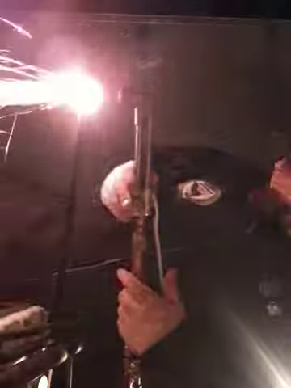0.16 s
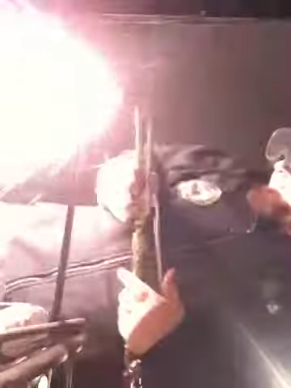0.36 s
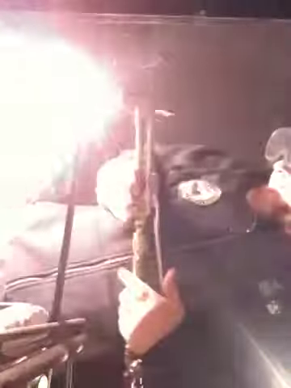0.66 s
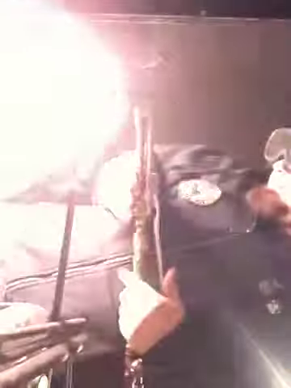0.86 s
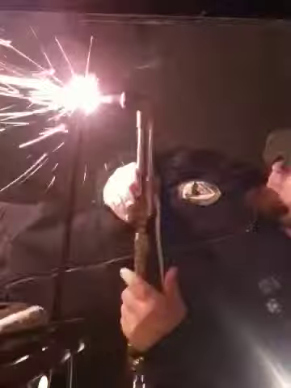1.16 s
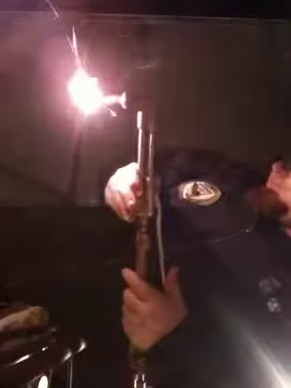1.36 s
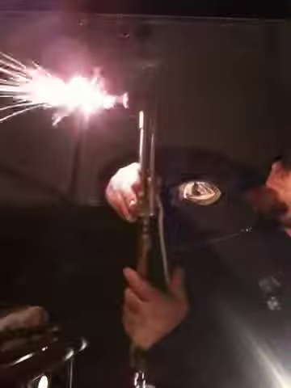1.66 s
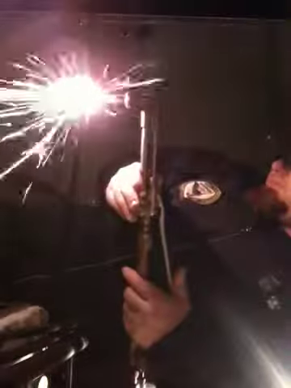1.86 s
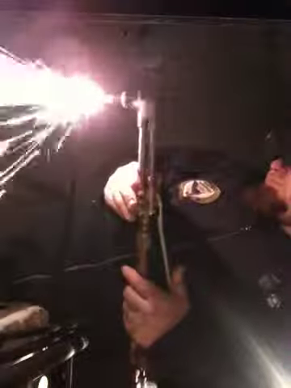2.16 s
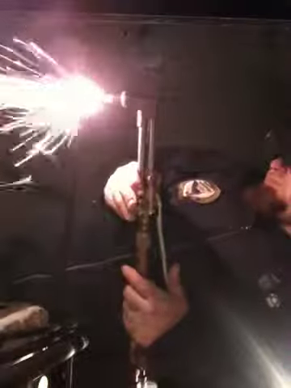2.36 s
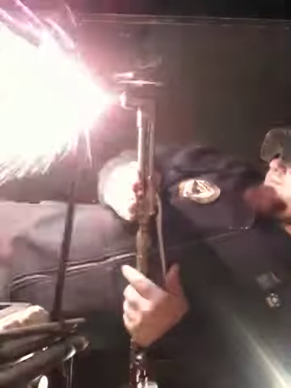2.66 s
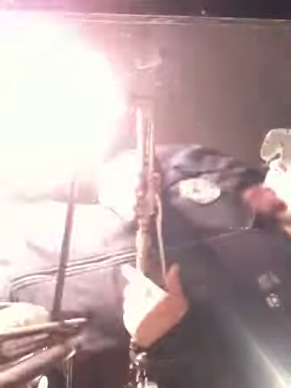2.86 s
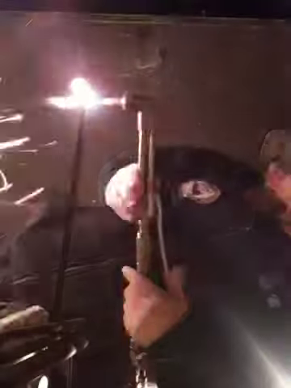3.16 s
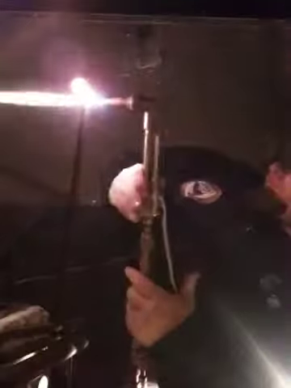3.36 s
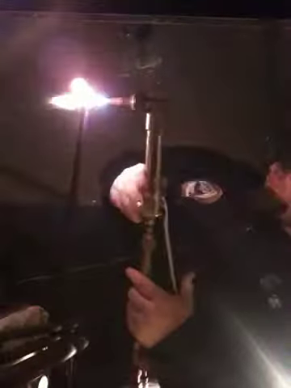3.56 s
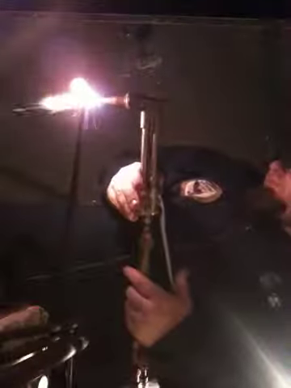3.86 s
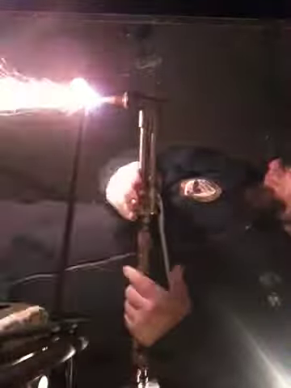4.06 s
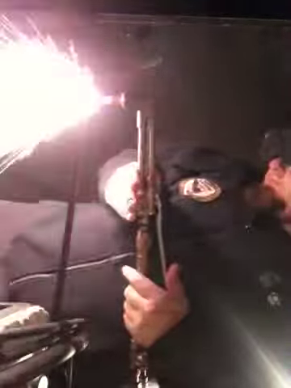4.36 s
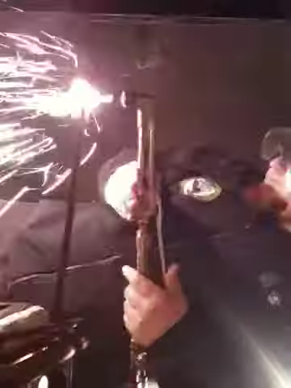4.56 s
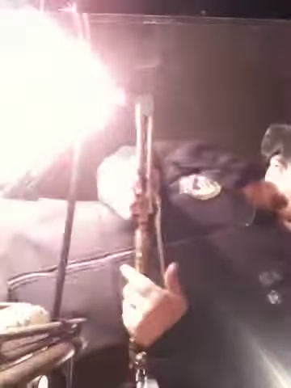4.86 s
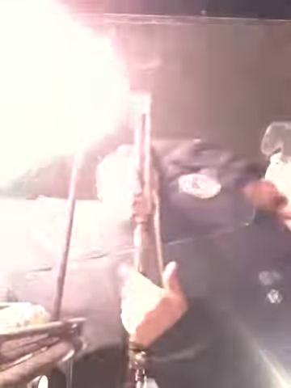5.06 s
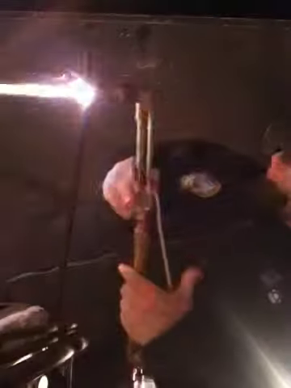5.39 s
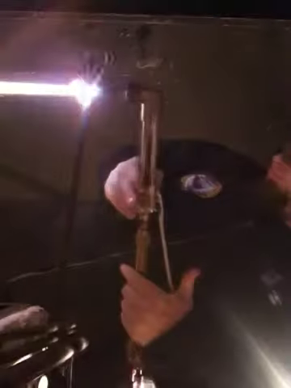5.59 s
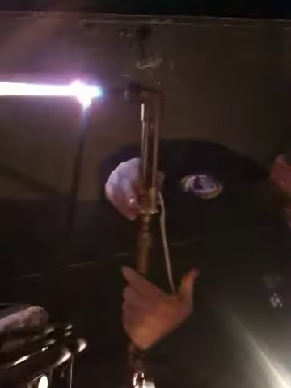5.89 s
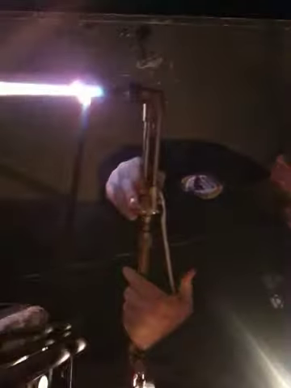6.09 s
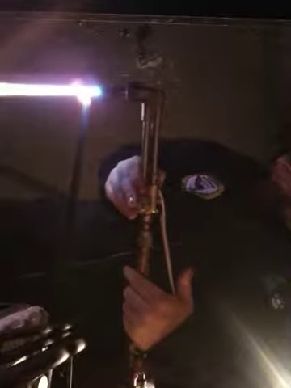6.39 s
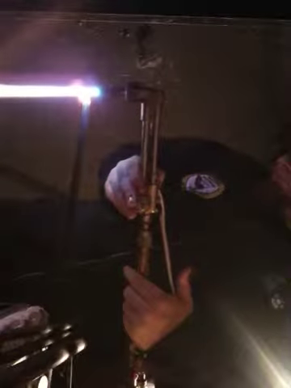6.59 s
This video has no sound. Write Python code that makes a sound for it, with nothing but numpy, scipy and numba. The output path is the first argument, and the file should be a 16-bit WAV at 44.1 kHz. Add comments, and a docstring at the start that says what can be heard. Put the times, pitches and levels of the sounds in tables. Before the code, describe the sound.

A cutting torch blasts three harsh, bright bursts of hissing oxygen through burning steel, then a lever knocks shut and a low flame roar swells.

```python
"""A gas cutting torch in a small workshop, a step or two from a single microphone.
Three bursts of cutting oxygen, from about 0, 2.3 and 4 s, are shaped noise that hisses, scours and rushes in the cut.
Steel burns and a heating flame roars low throughout, as noise in fluttering bands; light ticks ring the torch body.
After the third burst the lever snaps back with a dull knock at 5.6 s, and the roar swells towards the end.
Walls and bench give the torch fixed peaks and dips and a short tail; faint air noise lies under it all."""
import sys
import numpy as np
from scipy import signal
from scipy.fft import rfft, irfft, next_fast_len
from scipy.io import wavfile
from scipy.ndimage import uniform_filter1d
from numba import njit

SR = 44100
rng = np.random.default_rng(int(sys.argv[2]) if len(sys.argv) > 2 else 0)


def wav_out(sig):
    """Save sig, one row per channel (or a flat mono array), as 16-bit PCM at SR to the path in sys.argv[1]."""
    wavfile.write(sys.argv[1], SR, np.round(np.clip(np.atleast_2d(sig).T, -1, 1) * 32767).astype(np.int16))


def convert_level_to_amplitude(level_db):
    """Map a level in decibels to its linear amplitude factor."""
    exponent = np.asarray(level_db, float) / 20
    return 10 ** exponent


N = 296793
TIME = np.arange(N) / SR

# Spectral density of the air noise: f/Hz, level/dB
AIR_SPECTRUM = [(40, -1), (300, -0.5), (6000, -10), (16000, -18.5)]
AIR_DB = -68

# Spectral density of the faint rumble: f/Hz, level/dB
RUMBLE_SPECTRUM = [(25, 2.5), (60, -25), (110, -33.5), (150, -56), (300, -88)]
RUMBLE_DB, RUMBLE_SLOPE = -40.5, 0.4  # level when the roar is at FLARE_DB; dB of rumble per dB of roar

# Low roar of the heating flame over time: t/s, level/dB
ROAR_LEVEL = [(0.03, -63.5), (0.96, -59.5), (2.3, -62), (3.4, -58.5), (3.9, -55.5), (4.42, -65),
              (5.1, -56.5), (5.39, -60.5), (5.7, -48.5), (6.04, -51), (6.16, -48.5), (6.7, -50)]
# Spectral density of that roar: f/Hz, level/dB
ROAR_SPECTRUM = [(60, -44), (120, -15.5), (170, -5.5), (230, -3), (350, 0.5), (600, -3), (900, -7),
                 (1800, -48), (4000, -82)]
FLARE_DB, FLARE_SLOPE = -57, 2.18  # extra roar at strong burning; dB of it per dB of burning
STRONG_BURN_DB = -42

# Burning at the cut over time: t/s, level/dB
BURN_LEVEL = [(0.03, -48.5), (0.39, -52), (0.58, -58.5), (1.17, -57.5), (1.38, -51), (1.72, -52.5),
              (1.79, -58), (1.99, -53.5), (2.03, -58.5), (2.28, -53.5), (2.34, -52), (2.42, -55.5),
              (2.89, -56.5), (3.07, -53.5), (3.15, -48), (3.408, -42), (3.498, -49.5), (3.55, -47),
              (3.6, -50), (3.72, -47), (3.942, -42.5), (3.982, -46), (4.478, -48), (4.512, -41),
              (4.545, -44), (4.712, -56), (4.91, -48.5), (4.926, -45.5), (4.97, -49), (5.516, -41.5),
              (5.56, -47.5), (5.66, -54), (5.78, -51), (5.822, -53.5), (6.19, -50.5), (6.426, -49.5),
              (6.7, -51.5)]
# Spectral density of the burning steel: f/Hz, level/dB
BURN_SPECTRUM = [(250, -24), (500, -4), (1100, 2), (1800, -5), (2700, -11.5), (5000, -22.5), (8000, -33),
                 (16000, -71)]

# Blows of lever and spatter: t/s, level/dB, dull knock over the tick/dB, decay constant of the rattle/s
BLOWS = [(1.739, -38, -20, 0.003), (4.514, -50, -14, 0.0041), (5.582, -39, 6.5, 0.0059),
         (5.592, -44, 10, 0.0098), (5.613, -53.5, 14.5, 0.018), (5.866, -60.5, -16, 0.018),
         (5.997, -58, -16, 0.0072)]
# Dull modes of the torch body: f/Hz, level/dB, t60/s
KNOCK_MODES = [(196, -14, 0.032), (261, 0, 0.034), (322, -4, 0.071), (580, -11, 0.035), (1350, -6, 0.012)]
# Bright modes of the torch body: f/Hz, level/dB, t60/s
TICK_MODES = [(3100, -1, 0.013), (3450, -5, 0.014), (4550, -1, 0.0081), (6500, -2, 0.0065),
              (7200, 4, 0.0068), (8260, -1, 0.0052), (9400, -4, .004)]

# Presses of the oxygen lever: opening t/s, shutting t/s, closing rate/(dB/s),
# leaking hiss from the opening on, level/dB, idle rush in the cut over the burning/dB
PRESSES = [(0.006, 1.961, 360, -84, -5.5), (2.253, 3.414, 293, -77.5, -10), (4.039, 5.47, 211, -79, -15)]
OPENING_S, OPENING_BEND = 0.044, 0.89  # time to full flow; exponent of the rise
BLEED_DB, BLEED_DB_PER_S = -24, 54  # gas left in the torch drains slowly after shutting

# Hiss at the nozzle while the lever is held, one curve a press: t/s, level/dB
HISS_LEVELS = [
    [(0.05, -35), (0.296, -35.5), (0.426, -41), (0.642, -39), (0.722, -43.5), (1.072, -43.5), (1.24, -40),
     (1.29, -32.5), (1.492, -31.5), (1.77, -32), (1.8, -38.5), (1.9, -42.5), (1.958, -48.5)],
    [(2.29, -38), (2.32, -35.5), (2.36, -36), (2.4, -44), (2.524, -37.5), (2.828, -41.5), (3.106, -41),
     (3.128, -38), (3.25, -34), (3.326, -36.5), (3.414, -42.5)],
    [(4.08, -41), (4.12, -38.5), (4.314, -35.5), (4.424, -38), (4.596, -37.5), (4.65, -45), (4.81, -39.5),
     (4.826, -37), (4.956, -40), (5.004, -36.5), (5.044, -40.5), (5.162, -39), (5.268, -33.5), (5.382, -36),
     (5.47, -38.5)],
]
# How the jet strikes the steel: t/s, centre of the scouring f/Hz, scouring over its place between hiss and burning/dB,
# shock cells over the hiss/dB, rush in the cut over the burning/dB
STRIKE = [(0.05, 5060, 3, -4, 3.5), (0.4, 5140, 3.5, -5.5, 5.5), (0.68, 4930, 0.2, -2, 2.5),
          (1.0, 4550, 0.5, -3, 4.5), (1.25, 4600, 0.8, -7.5, 2.5), (1.42, 4200, -3, -6, 2),
          (1.74, 4300, 0.5, -6.5, 4), (1.9, 4760, 4, -1.5, 5.5), (2.33, 4540, 1.7, -4, 3.5),
          (2.6, 4740, 2, -5.5, 5), (3.05, 4680, -0.5, -3, 2.5), (3.17, 4550, 2.5, -3, 6.5),
          (3.27, 4260, 0.2, -4, 2.5), (3.42, 5030, 3.5, 2, 2), (3.7, 4080, -7, -4, 3),
          (3.98, 4000, 12, -1, 7), (4.12, 4750, 0, -3.5, 2.5), (4.5, 4500, 0.1, -3.5, 1),
          (4.75, 4680, .6, -6, 3.5), (5.1, 4650, -.6, -5.5, 1), (5.3, 4750, 1, -3.5, 3),
          (5.5, 4804, 2, .6, 3), (5.75, 4220, .6, -1, 3)]
# Spectral density of the hiss: f/Hz, level/dB
HISS_SPECTRUM = [(1500, -46), (4000, -8), (6000, -30), (8000, -1.5), (10500, -0.5), (12500, -1.5),
                 (13700, 0.5), (15000, -4.5), (15700, -5)]
# Spectral density of the jet's shock cells: f/Hz, level/dB
SHOCK_SPECTRUM = [(3000, -54), (5900, -5), (6350, -1), (7350, -1.5), (7800, -6.5), (14000, -27)]
# Spectral density of the scouring, ahead of its moving band-pass: f/Hz, level/dB
SCOUR_SPECTRUM = [(1500, -20), (3000, -2.5), (6000, -3.5), (10000, -22)]
# Spectral density of the rush inside the cut: f/Hz, level/dB
KERF_SPECTRUM = [(700, -25), (1500, -2.5), (2100, -4.5), (2800, -2.5), (3400, -7), (5000, -32), (9000, -41)]
SCOUR_BURN_SHARE = 0.36  # how far, in dB, the scouring lies from hiss (0) towards burning (1)
IDLE_SCOUR_DB = -5.5  # idle scouring relative to the idle rush in the cut
IDLE_SLOPE = 0.51  # dB that the idle rush gains over the burning per dB of burning

# Peaks and dips of room, bench and microphone: f/Hz, width/Hz, level/dB
ROOM_COLOUR = [(181, 46, 4), (241, 51, 6.5), (293.7, 67, -12.5), (360.6, 53, 5), (428, 110, -5.5),
               (585, 79, 5.5), (685.3, 38, 9.5), (732, 220, -3.5), (1096, 270, 3), (1074, 38, 3),
               (1210, 69, -2.5), (1460, 320, -1.5), (1622, 29, 4.5), (1983, 470, -3), (2163, 41, 5),
               (2380, 130, -6.5), (2724, 370, 3), (2910, 240, 0.5), (3370, 180, 2), (3836, 150, 2.5),
               (4650, 46, -7), (4990, 600, 3), (6203, 90, 3.5), (6600, 190, 0), (6830, 79, 4.5),
               (7380, 120, 3), (10600, 220, -0.5), (15400, 430, 5.5)]
ROOM_T60_S, ROOM_DB = 0.15, -10.5  # decay of the tail's lower part; energy of the tail against the direct sound


def curve(rows):
    """Columns of a table joined by straight lines in time."""
    s, *columns = np.transpose(rows)
    return [np.interp(TIME, s, column) for column in columns]


def walk(rate):
    """Random levels held 1 / rate s and slewed twice; spread near 1."""
    hold = int(SR / rate)
    steps = np.repeat(rng.standard_normal(N // hold + 1), hold)
    slewed = uniform_filter1d(uniform_filter1d(steps, hold), hold)
    return 0.77 * slewed[:N]


def turbulence(spectrum, swell_db, flicker_db, flicker_hz, spit):
    """Noise of rms 1 in octave-spaced overlapping bands that swell together and flicker alone; spit adds sharp grains."""
    size = next_fast_len(N)
    octave = np.log2(np.maximum(np.arange(size // 2 + 1) * SR / size, 1))
    hz, db = np.transpose(spectrum)
    grains = np.exp(spit * rng.standard_normal(N))
    white = rfft(rng.standard_normal(N) * grains, size)
    eddies = white * convert_level_to_amplitude(np.interp(octave, np.log2(hz), db))
    swell = swell_db * walk(flicker_hz / 2)
    lowest, highest = 6, 14  # band centres as powers of two, in Hz
    out = 0
    for centre in range(lowest, highest + 1):
        distance = np.clip(np.clip(octave, lowest, highest) - centre, -1, 1)
        share = np.cos(np.pi / 2 * distance) ** 2
        flicker = flicker_db * walk(flicker_hz)
        out = out + irfft(eddies * share, size)[:N] * convert_level_to_amplitude(swell + flicker)
    return out / np.std(out)


def air_noise():
    """Steady, faint air noise that falls off towards the treble."""
    return convert_level_to_amplitude(AIR_DB) * turbulence(AIR_SPECTRUM, 0.4, 0.23, 11.0, spit=0.05)


def rumble(roar_db):
    """A faint rumble comes and goes in deep puffs and partly follows the roar."""
    puffs = turbulence(RUMBLE_SPECTRUM, 3.8, 1.7, 6.7, spit=0.21)
    return convert_level_to_amplitude(RUMBLE_DB + RUMBLE_SLOPE * (roar_db - FLARE_DB)) * puffs


def heating_flame(roar_db, burn_db):
    """The flame roars low in fluttering bands and flares up with strong burning."""
    roar = turbulence(ROAR_SPECTRUM, 0.18, 0.78, 24.0, spit=0.26)
    flare = convert_level_to_amplitude(FLARE_DB + FLARE_SLOPE * (burn_db - STRONG_BURN_DB))
    return (convert_level_to_amplitude(roar_db) + flare) * roar


def burning_steel(burn_db):
    """Steel burning at the cut flutters more deeply than the hiss of the jet."""
    return convert_level_to_amplitude(burn_db) * turbulence(BURN_SPECTRUM, 1.04, 1.0, 18.0, spit=0.32)


def ring(modes):
    """Response of a few decaying modes to one blow."""
    t = TIME[:SR // 8]
    return sum(convert_level_to_amplitude(db - 60 * t / t60) * np.cos(2 * np.pi * hz * t) for hz, db, t60 in modes)


def ticks():
    """Each blow is a first contact and a short rattle that ring the torch body."""
    out, t = np.zeros(N + SR), TIME[:SR // 20]
    push = np.hanning(int(0.0012 * SR))  # 1.2 ms
    for s, db, knock_db, rattle_s in BLOWS:
        blow = 0.11 * rng.standard_normal(len(t)) * np.exp(-t / rattle_s)
        blow[0] = 0.63  # first contact
        sound = signal.fftconvolve(blow, ring(TICK_MODES))
        # only the first contact reaches the heavy parts, as a soft push
        knock = convert_level_to_amplitude(knock_db) * np.convolve(ring(KNOCK_MODES), push / push.sum())
        sound[:len(knock)] += knock
        out[int(s * SR):][:len(sound)] += convert_level_to_amplitude(db) * sound
    return out[:N]


def lever():
    """Valve opening 0-1 with its slow bleed, and the gains of leaking hiss and idle rush set at each press."""
    opening, leak, idle = 0, np.zeros(N), np.zeros(N)
    for opens, shuts, closing, leak_db, idle_db in PRESSES:
        after = np.maximum(TIME - shuts, 0)
        rise = np.clip((TIME - opens) / OPENING_S, 0, 1) ** OPENING_BEND
        bleed = convert_level_to_amplitude(BLEED_DB - BLEED_DB_PER_S * after)
        fall = np.maximum(convert_level_to_amplitude(-closing * after), bleed)
        opening = opening + rise * fall
        leak[TIME > opens] = convert_level_to_amplitude(leak_db)
        idle[TIME > opens] = convert_level_to_amplitude(idle_db)
    return opening, leak, idle


@njit
def band(x, hz, width):
    """State-variable band-pass with a moving centre."""
    y, band_state, low_state = np.empty(len(x)), 0., 0.
    for i in range(len(x)):
        g, k = np.tan(np.pi * hz[i] / SR), width / hz[i]
        v = (band_state + g * (x[i] - low_state)) / (1 + g * (g + k))
        band_state = 2 * v - band_state
        low_state = low_state + 2 * g * v
        y[i] = k * v
    return y


def jet(burn_db):
    """The free jet hisses and its shock cells sing; where it meets the steel and enters the cut the noise sits lower."""
    held_db, = curve(np.concatenate(HISS_LEVELS))
    scour_hz, strike_db, shock_db, kerf_db = curve(STRIKE)
    opening, leak, idle = lever()
    idle = idle * convert_level_to_amplitude(IDLE_SLOPE * (burn_db - STRONG_BURN_DB))

    hiss = turbulence(HISS_SPECTRUM, 0.26, 0.51, 23.0, spit=0.32)
    shock = turbulence(SHOCK_SPECTRUM, 0.45, 0.9, 7.9, spit=0.2)
    free = (convert_level_to_amplitude(held_db) * opening + leak) * (hiss + convert_level_to_amplitude(shock_db) * shock)

    # the gap between tip and steel sets where the scouring peaks
    scour = band(turbulence(SCOUR_SPECTRUM, 1.0, 0.99, 18.0, spit=0.13), scour_hz, 2570.0)
    scour_db = strike_db + held_db + SCOUR_BURN_SHARE * (burn_db - held_db)
    scour_gain = convert_level_to_amplitude(scour_db) * opening + convert_level_to_amplitude(burn_db + IDLE_SCOUR_DB) * idle
    surface = scour_gain * scour / np.std(scour)

    kerf = turbulence(KERF_SPECTRUM, 1.0, 1.0, 12.0, spit=0.27)
    inside = convert_level_to_amplitude(burn_db) * (convert_level_to_amplitude(kerf_db) * opening + idle) * kerf
    return free + surface + inside


def workshop(x):
    """Fixed peaks and dips, then a dense tail that loses its treble first."""
    size = 2 * next_fast_len(N // 2 + SR)
    f = np.arange(size // 2 + 1) * SR / size
    colour_db = sum(db * np.exp(-3.5 * ((f - hz) / width) ** 2) for hz, width, db in ROOM_COLOUR)
    # folding the cepstrum makes the colouring ring after a sound, never before it
    cepstrum = irfft(np.log(convert_level_to_amplitude(colour_db)), size)
    cepstrum[1:size // 2] *= 2
    cepstrum[size // 2 + 1:] = 0
    colour = np.exp(rfft(cepstrum))

    t = TIME[:SR // 2]
    noise = rng.standard_normal(len(t)) * np.clip(t / 0.0024 - 0.5, 0, 1)
    # thin out the bass: below a few hundred hertz a small room has only its separate modes
    noise = noise - uniform_filter1d(noise, size=22)
    dull = uniform_filter1d(noise, size=6)
    bright = noise - dull
    tail = dull * convert_level_to_amplitude(-60 * t / ROOM_T60_S) + bright * convert_level_to_amplitude(-3.5 - 60 * t / (0.74 * ROOM_T60_S))
    tail = convert_level_to_amplitude(ROOM_DB) * tail / np.linalg.norm(tail)
    tail[0] = 1  # direct sound
    return irfft(rfft(x, size) * colour * rfft(tail, size), size)[:N]


def scene():
    """The torch in its room over the air noise; one microphone feeds both channels."""
    burn_db, = curve(BURN_LEVEL)
    roar_db, = curve(ROAR_LEVEL)
    fire = rumble(roar_db) + heating_flame(roar_db, burn_db) + burning_steel(burn_db)
    torch = fire + ticks() + jet(burn_db)
    return np.tile(air_noise() + workshop(torch), (2, 1))


def roll_off(x):
    """The treble ends steeply here."""
    return signal.sosfilt(signal.butter(12, 16500, fs=SR, output="sos"), x)


def record(dry):
    """The microphone loses the bass steeply below 140 Hz, and the top is cut sharply at 15720 Hz."""
    bass_cut = signal.butter(4, 140.0, "high", fs=SR, output="sos")
    top_cut = signal.ellip(14, 0.3, 80, 15720, fs=SR, output="sos")
    sound = signal.sosfilt(bass_cut, dry)
    sound = signal.sosfilt(top_cut, sound)
    return roll_off(sound)


dry = scene()
out = record(dry)
wav_out(out)
```